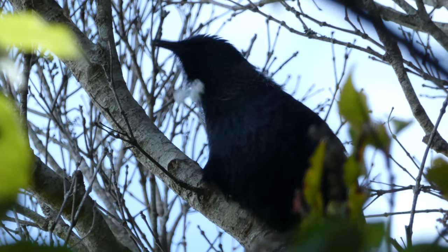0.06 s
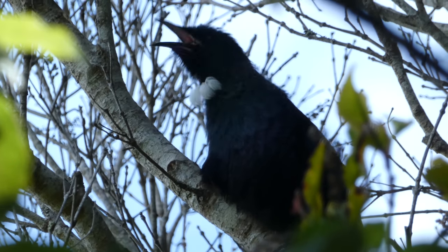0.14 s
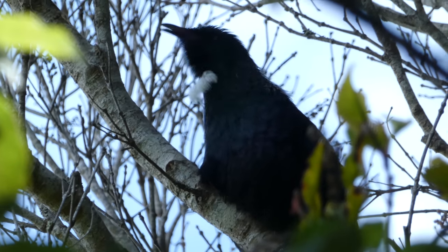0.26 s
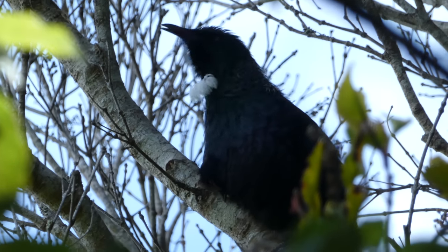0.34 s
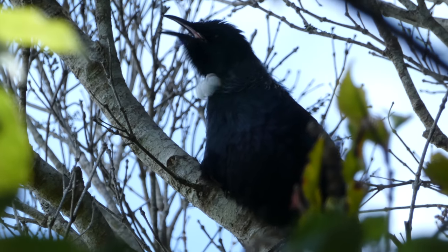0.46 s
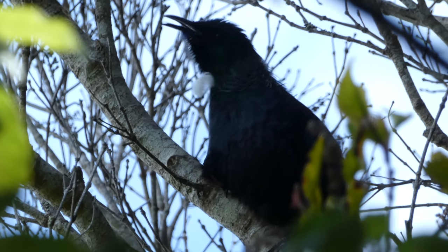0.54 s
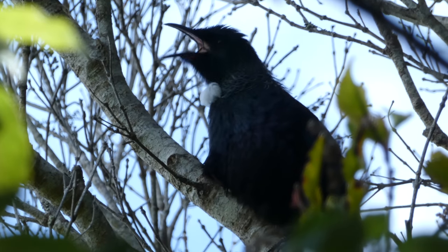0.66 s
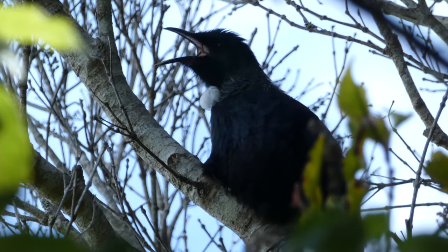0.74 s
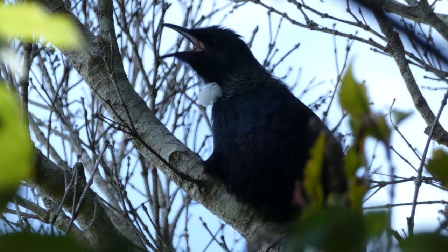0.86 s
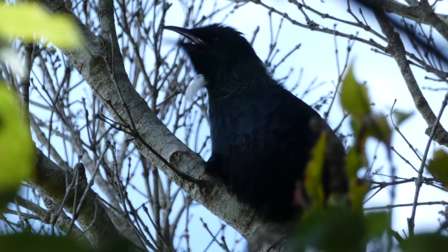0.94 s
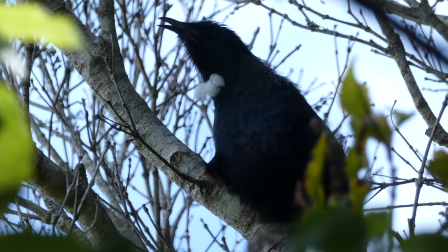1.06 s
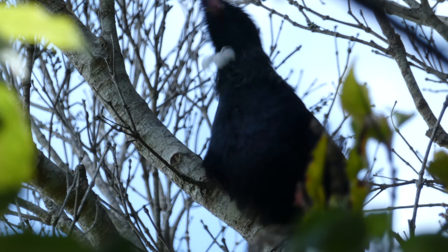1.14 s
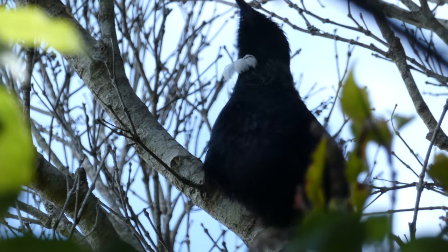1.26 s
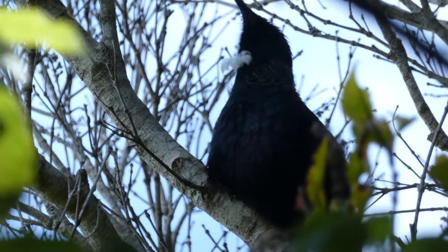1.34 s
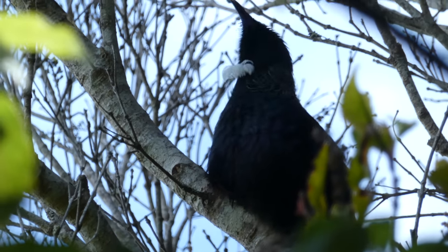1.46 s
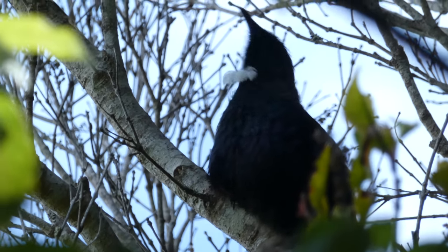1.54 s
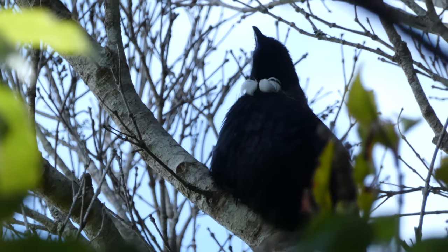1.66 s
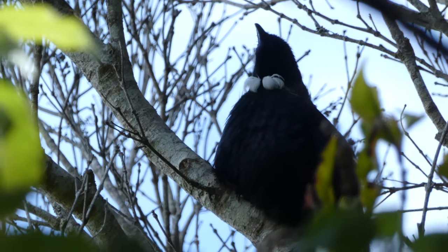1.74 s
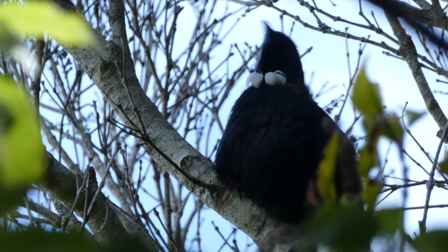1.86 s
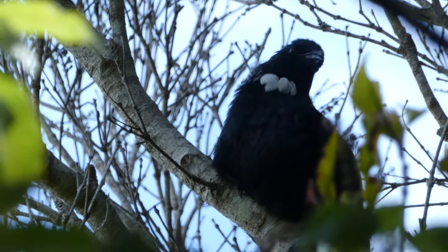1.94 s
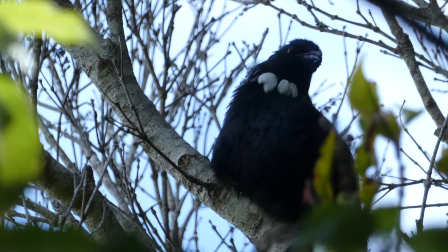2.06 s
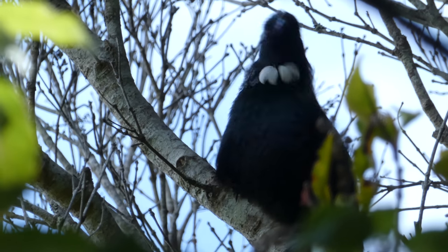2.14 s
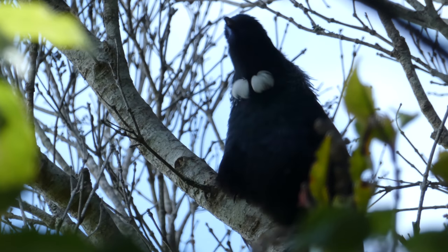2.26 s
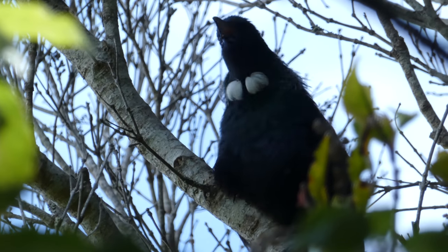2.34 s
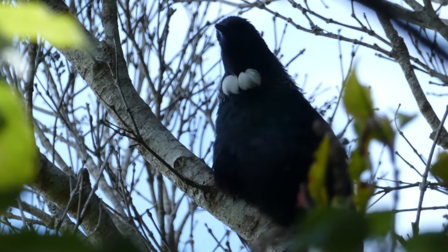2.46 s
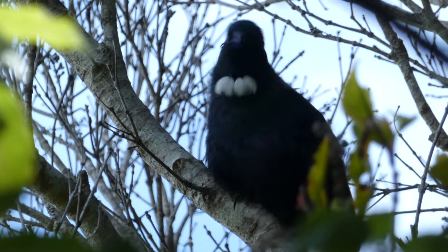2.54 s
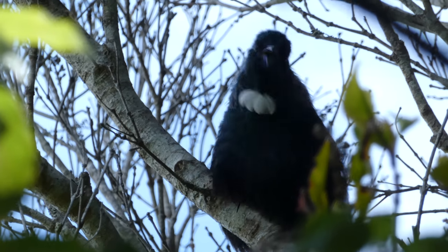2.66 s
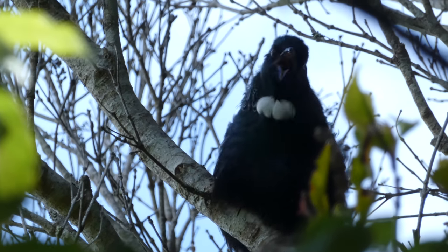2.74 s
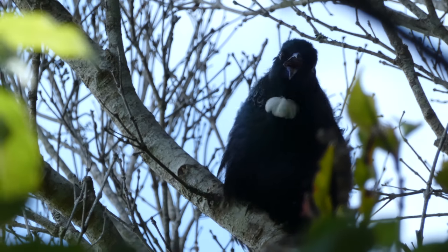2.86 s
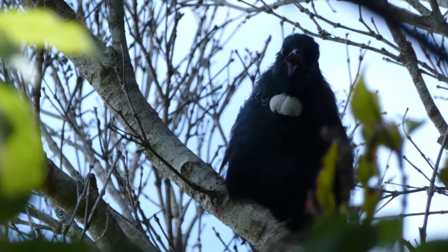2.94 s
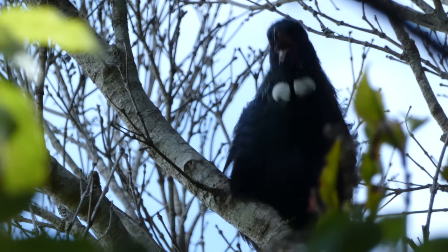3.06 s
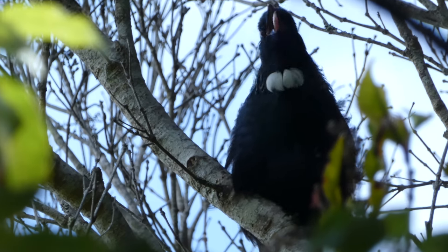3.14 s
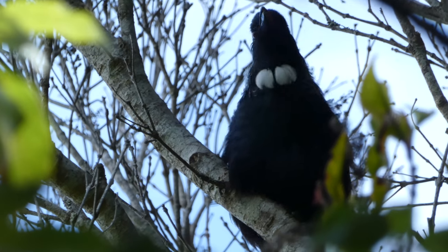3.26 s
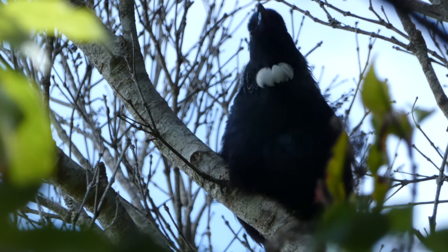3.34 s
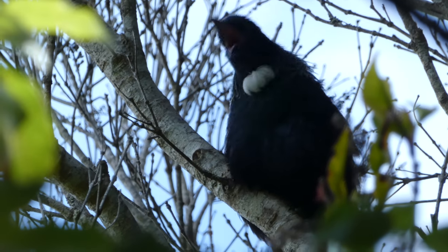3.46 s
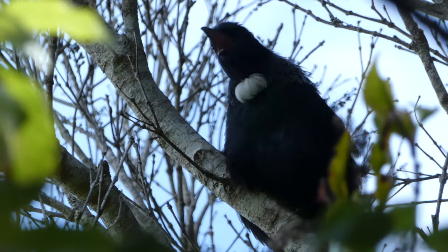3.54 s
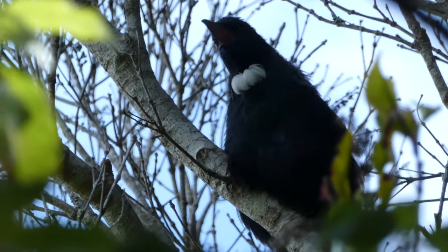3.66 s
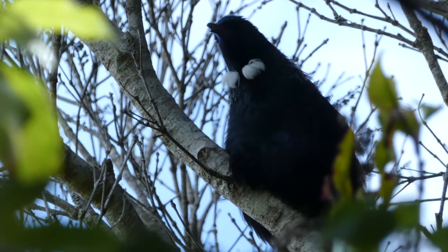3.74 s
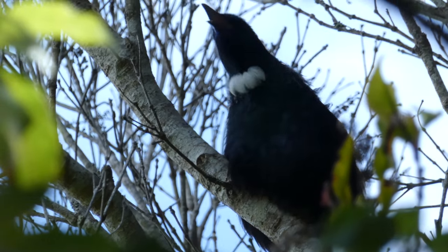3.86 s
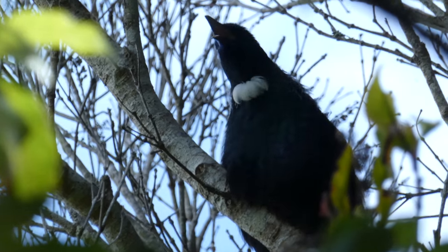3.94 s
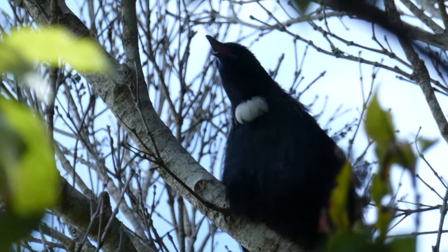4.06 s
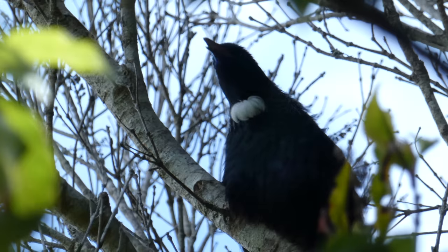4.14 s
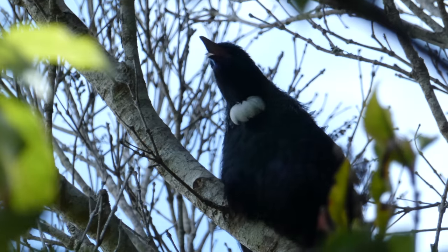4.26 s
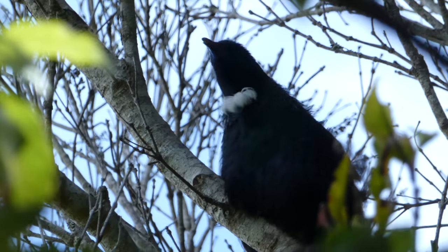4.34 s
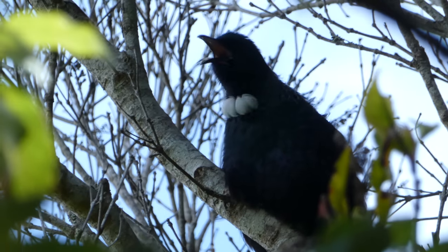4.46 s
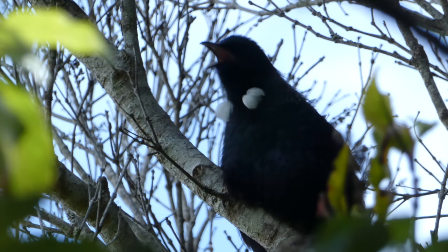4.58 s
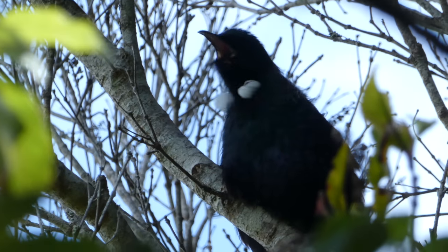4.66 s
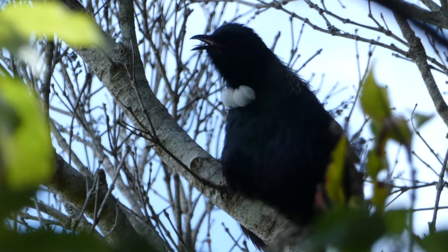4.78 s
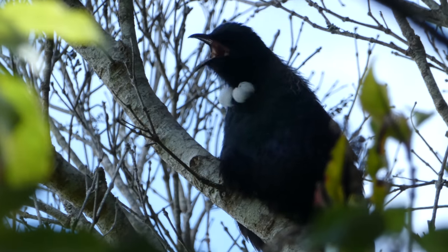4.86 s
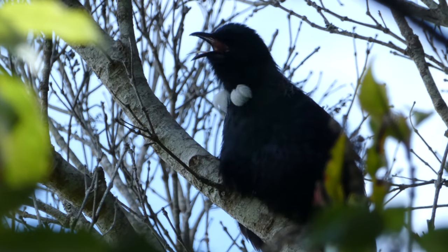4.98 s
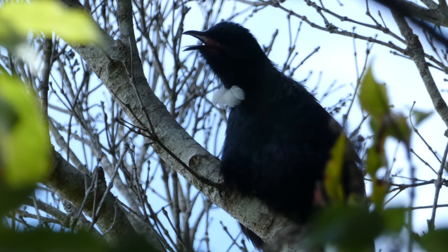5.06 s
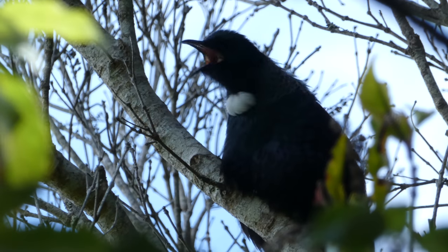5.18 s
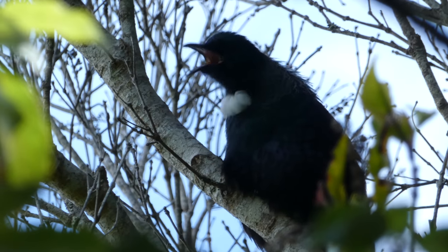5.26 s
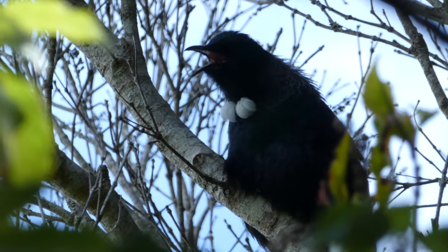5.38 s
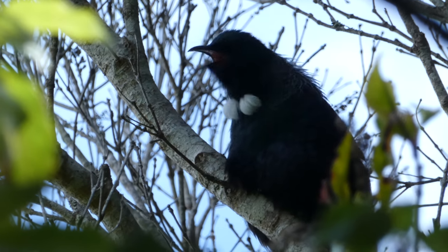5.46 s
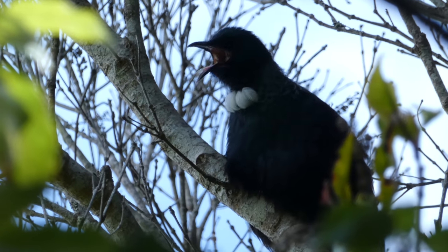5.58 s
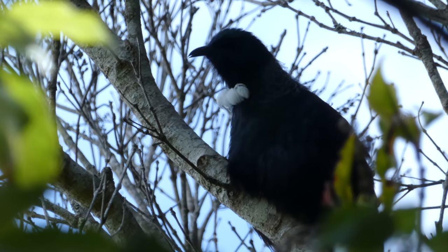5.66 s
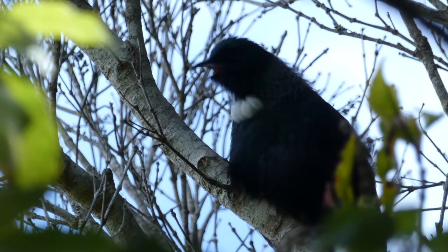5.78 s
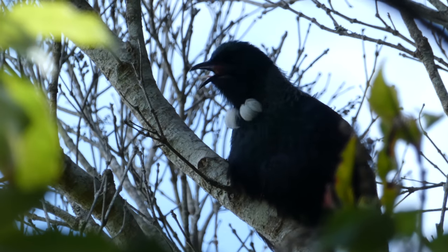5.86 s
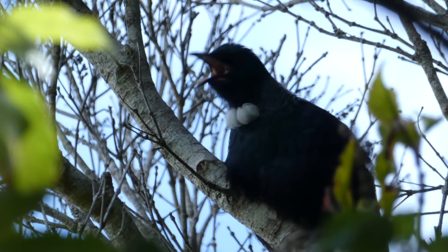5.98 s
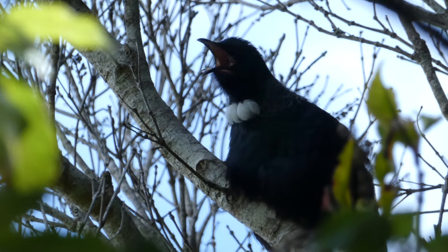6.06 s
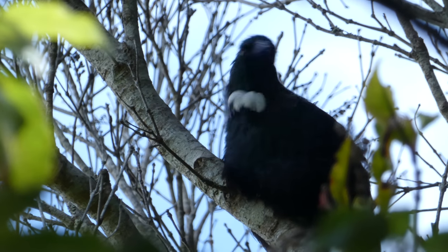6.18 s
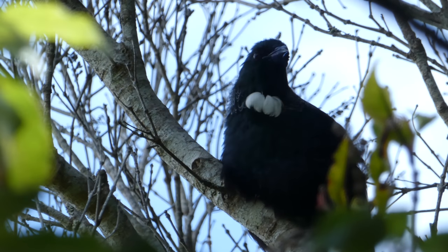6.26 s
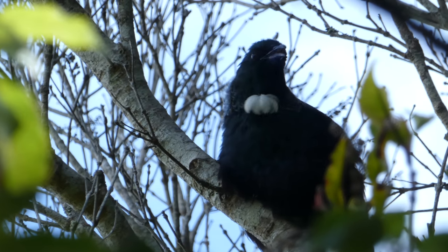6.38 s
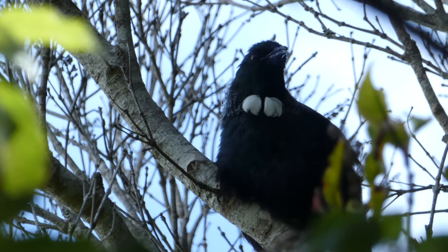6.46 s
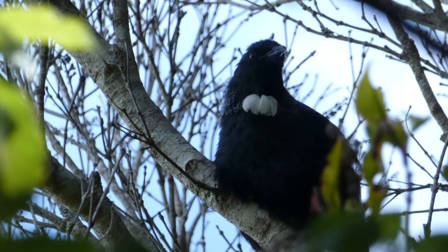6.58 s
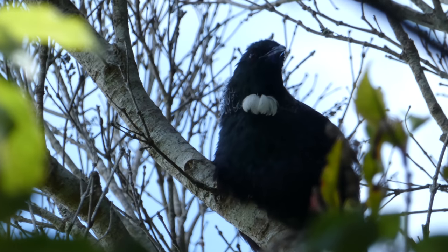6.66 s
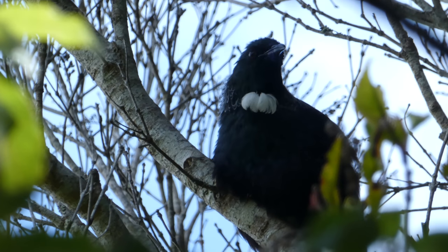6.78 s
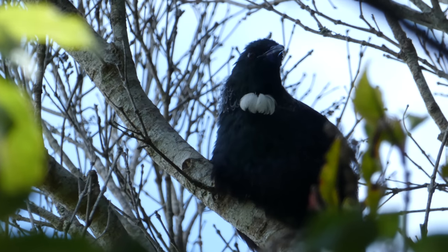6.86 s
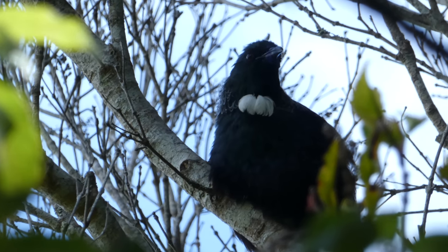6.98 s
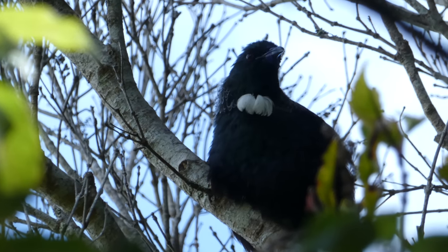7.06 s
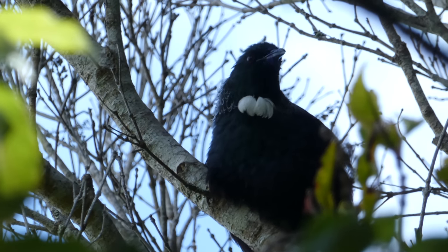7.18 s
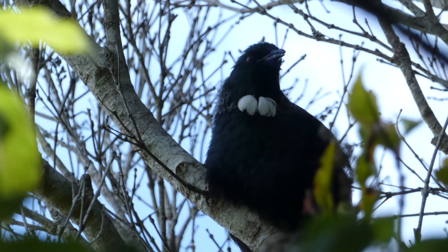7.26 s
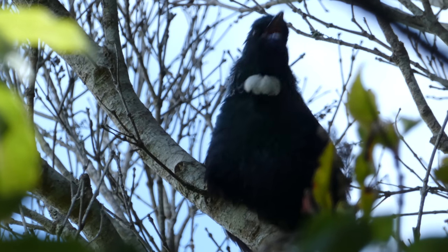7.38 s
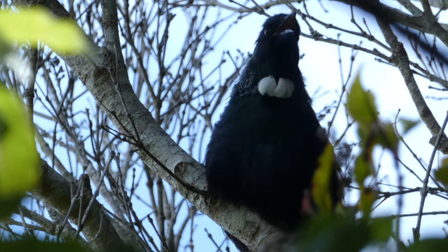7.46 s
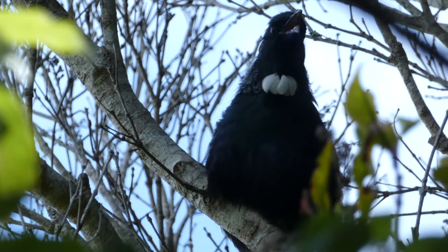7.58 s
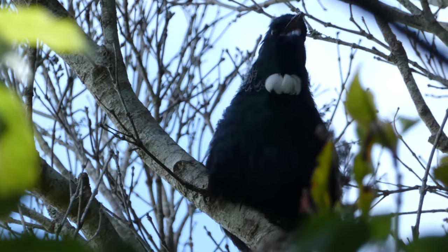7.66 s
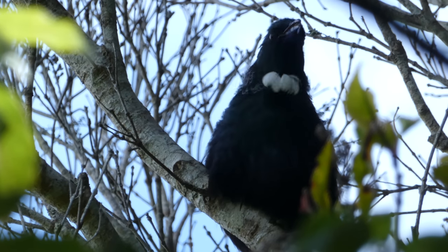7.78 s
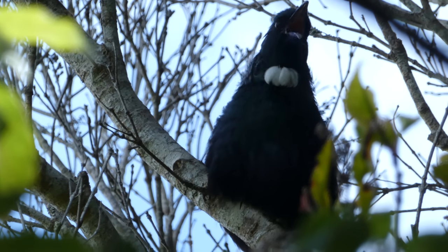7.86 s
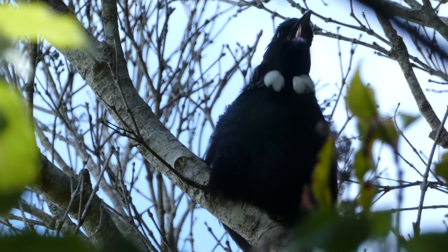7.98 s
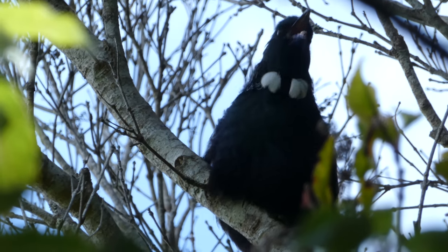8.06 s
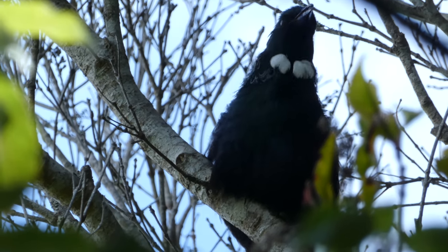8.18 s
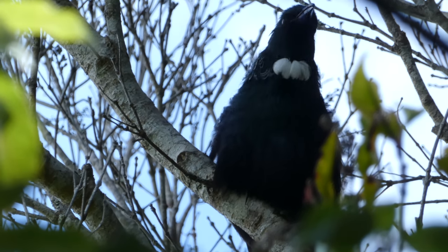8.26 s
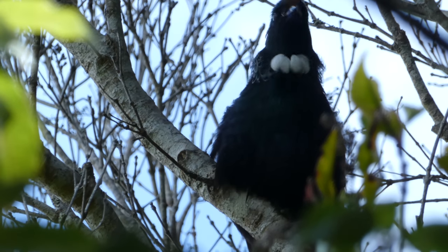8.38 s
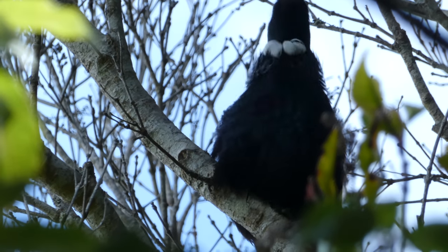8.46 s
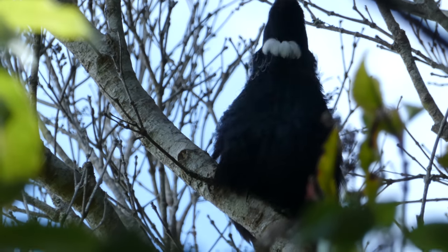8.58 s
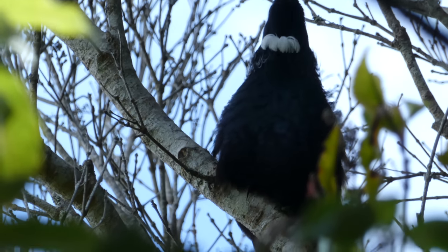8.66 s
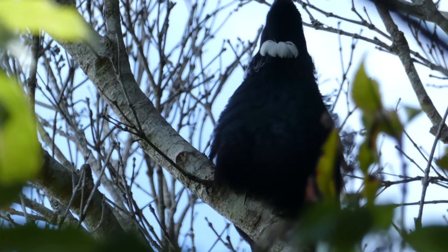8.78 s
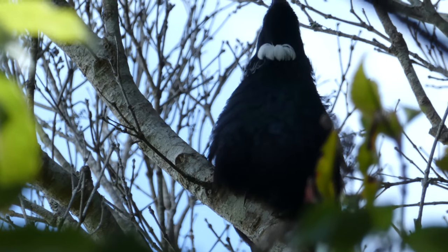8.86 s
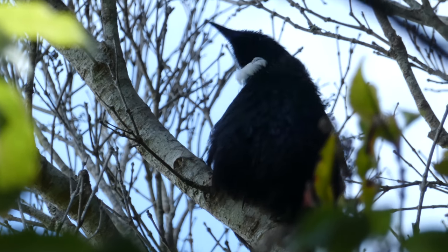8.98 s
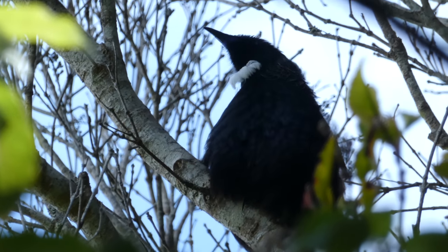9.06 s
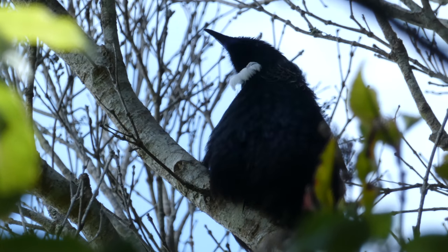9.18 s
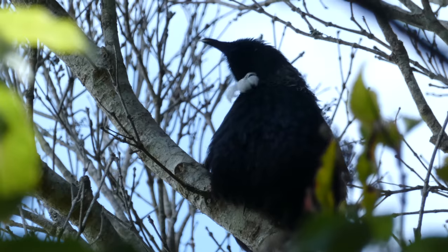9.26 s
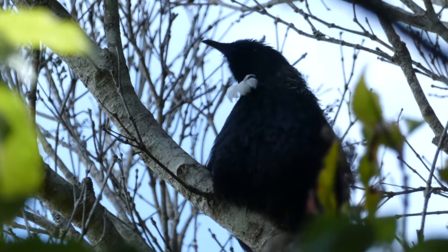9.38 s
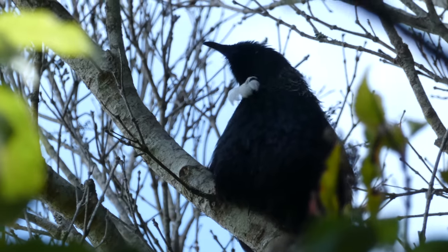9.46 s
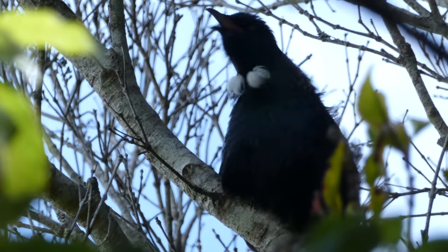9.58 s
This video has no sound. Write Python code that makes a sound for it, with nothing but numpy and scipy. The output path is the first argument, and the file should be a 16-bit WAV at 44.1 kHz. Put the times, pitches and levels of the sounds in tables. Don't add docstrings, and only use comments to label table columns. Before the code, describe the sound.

A close perched songbird delivers clicks, trills, whistles, heavy rattles and a ringing bell note, with short pauses, over faint outdoor hiss.

```python
import sys
import numpy as np
from scipy import signal
from scipy.fft import rfft, irfft, next_fast_len
from scipy.io import wavfile
from scipy.ndimage import uniform_filter1d, map_coordinates

SR = 44100
rng = np.random.default_rng(int(sys.argv[2]) if len(sys.argv) > 2 else 0)


def file_out(sig):
    cols = np.atleast_2d(sig).T
    lim = np.clip(cols, -1, 1)
    pcm = np.round(lim * 32767).astype(np.int16)
    wavfile.write(sys.argv[1], SR, pcm)


def decibels_to_gain(level_db):
    exponent = np.asarray(level_db, float) / 20
    return 10 ** exponent


N = 424683
TOP_HZ = 15750

# [pitch_hz, level_db per hz]
AIR_MID = [(20, -0.5), (59, -13.5), (310, -3), (1690, -12), (1830, -5), (2560, -17.5), (4230, -16.5),
           (15700, -28.5)]
# [pitch_hz, level_db per hz]
AIR_SIDE = [(20, -48), (59, -22), (260, -5.5), (560, -9), (1600, -17), (3000, -25.5), (6000, -34),
            (15700, -39.5)]
AIR_DB = -67
# [time_s, level_db]
TRAFFIC = [
    (0, -65.5),
    (.6, -65.5),
    (1.6, -63.5),
    (2.2, -69),
    (3.5, -72),
    (4.2, -89),
    (7.3, -88),
    (9.63, -92),
]
# [centre_hz, width_hz, level_db]
ROAD_RESONANCE = [(620, 720, 0)]

# [start_s, length_s, pitch_hz, level_db]
FAR_BIRDS = [(1.589, 0.29, 650, -70), (1.55, 0.25, 807, -66.5), (6.583, 0.14, 4070, -63),
             (6.758, 0.13, 4170, -63), (6.945, 0.077, 4360, -63), (7.0, 0.19, 3670, -64.5),
             (7.313, 0.12, 4370, -65.5), (7.67, 0.19, 4100, -60), (8.196, 0.11, 4310, -60.5),
             (9.376, 0.11, 2195, -59), (5.48, 0.19, 4310, -62)]
FAR_SAG = 0.033
FAR_BLUR_HZ = 150

# [pitch_hz, t60_s]
TREE_DECAY = [(500, 0.42), (2000, 0.39), (6000, 0.26), (12000, 0.11)]
# [delay_s, level_db]
ECHOES = [
    (.004, -26),
    (.009, -4),
    (.016, -8),
    (.04, -19),
]
ECHO_TOP_HZ = 4500
LEAF_T60_S, LEAF_DB, LEAF_HZ = 0.23, -1, 5000

# delay_s, length_s, first_hz, middle_hz, last_hz, level_db
GULP = (.003, .023, 930, 650, 630, -45)

# [time_s, level_db, pitch_hz, throat_drop (0-1)]
BARKS = [
    [(1.192, -62, 991.4, 0.1), (1.211, -35, 1004, 0.1), (1.233, -40, 990, 0.3), (1.249, -33.5, 817, 0.99),
     (1.275, -46.5, 780, 1)],
    [(8.453, -65, 999, 0.01), (8.466, -37, 985.6, 0), (8.488, -28, 968.5, 0.01), (8.502, -30.5, 950, 0),
     (8.514, -28, 935.5, 0.03), (8.523, -34, 933.5, 0.4), (8.545, -40, 880, .8), (8.565, -48, 766, 0.99),
     (8.63, -64, 400, 1)],
]
# [pitch_hz, level_db per hz]
BARK_THROATS = [
    ([(600, -40), (838, -39), (954, -6), (1480, -15), (1960, 7.5), (3500, -9), (4240, 2.5), (13000, -49)], [(800, -31), (1550, -1), (2470, -22), (3280, -13.5), (4080, -33), (4950, -15.5), (6240, -30), (13000, -67)]),
    ([(600, -35), (700, -33), (890, -7), (1200, -14), (1810, -2.5), (3030, 0), (5740, -8.5), (15500, -90)], [(200, -56), (400, -4.5), (900, -9), (1500, 6), (2300, -40), (4800, -3), (7500, -10), (15500, -33.5)]),
]
STUTTER_HZ = (235, 295)
DROPPED_STUTTER_HZ, BARK_NOISE = 155, .46

# [start_s, length_s, pitch_hz, level_db]
WHEEZES = [(2.365, .041, 9338, -68), (2.749, 0.014, 1100, -48), (2.753, 0.026, 4180, -50),
           (3.02, 0.061, 10240, -64), (4.61, 0.17, 5850, -66.5), (4.649, .02, 8000, -63),
           (4.883, 0.089, 4480, -55.5), (4.884, 0.072, 3276, -57), (5.45, 0.045, 8900, -60),
           (7.402, 0.07, 9100, -59.5), (7.733, .03, 9900, -67), (7.95, 0.23, 3500, -58),
           (8.3, 0.033, 2000, -58), (5.6, 0.074, 3130, -65), (5.92, .06, 7400, -64), (7.95, .1, 12000, -66),
           (2.25, .03, 12000, -62), (3.085, .01, 1030, -60), (1, .015, 1400, -53)]
WHEEZE_WIDTH_HZ, WHEEZE_WIDENS = 180, 0.13

# [time_s, peak_db]
TICKS = [
    (.2019, -43),
    (.2177, -32),
    (.2315, -32),
    (.2458, -39),
    (.2580, -30),
    (.2712, -33),
    (.2822, -32),
]
# [centre_hz, width_hz, level_db]
TICK_THROAT = [(4290, 530, 4.5), (6980, 740, -5), (9450, 3600, -20.5)]
# [time_s, peak_db, low_hz, high_hz]
KNOCKS = [
    (3.4658, -32, 2490, 5150),
    (3.4904, -33, 2280, 4604),
    (3.5173, -29, 2640, 5520),
    (3.5464, -25.5, 2460, 5260),
    (3.574, -25, 2380, 4950),
    (3.6015, -26, 2580, 5400),
    (3.6325, -23, 2360, 5000),
    (3.6633, -26.5, 2620, 5340),
    (3.6926, -25, 2530, 5000),
    (3.7176, -38.5, 2600, 4500),
]
# [centre_hz, width_hz, level_db]
KNOCK_THROAT = [(2496, 470, -2.5), (5180, 740, 0.5), (4000, 300, -10.5), (7650, 410, -10),
                (9800, 2600, -20.5)]
KNOCK_FLOOR_HZ = 1900
# [time_s, peak_db]
SCRAPES = [
    (7.4104, -47.5),
    (7.4261, -37.5),
    (7.439, -39),
    (7.4505, -42.5),
    (7.4718, -33),
    (7.4834, -42),
]
# [centre_hz, width_hz, level_db]
SCRAPE_THROAT = [(1200, 2600, -3.5), (2280, 540, 1.5), (3730, 630, 4.5), (5530, 980, 0.5),
                 (9200, 2100, -10.5), (13010, 3700, -36)]
# [centre_hz, width_hz, level_db]
STROKE_THROAT = [(2000, 1600, -8.5), (3510, 500, 12.5), (4100, 601, -29)]
SNAP_SWEEP = 1.8
SNAP_TOP_HZ = 7500
# [time_s, peak_db, pitch_hz]
POPS = [
    (.1478, -37, 1050),
    (.1478, -42, 1600),
    (.1692, -38, 1200),
    (.1692, -43, 800),
    (5.285, -54, 9200),
    (7.627, -43, 2300),
    (7.629, -44, 4200),
]
POP_T60_S = .008

# [start_s, level_db]
TRILL = [(0.724, -42.5), (.749, -37), (.775, -36), (.799, -35), (.823, -33.5), (.849, -34.5), (.874, -36),
         (6.006, -38), (6.031, -34.5), (6.056, -35), (6.08, -35.5), (6.106, -34), (6.132, -35), (6.16, -35)]
# length_s, first_hz, middle_hz, last_hz
CHIRP = (.019, 1050, 1240, 1340)
CHIRP_PARTIALS = [-11, -0.5, 1.5, -17.5, -32.5, -50, -48, -36, -44, -44, -46]
# [centre_hz, width_hz, level_db]
TRILL_THROAT = [(1250, 700, 0), (2350, 900, 1), (3720, 520, 3), (5000, 1400, 2), (10000, 9000, 8)]
TRILL_OPENS, TRILL_SCATTER = 1.05, .008

# [start_s, length_s, pitch_hz, level_db]
HELD = [(0.125, 0.029, 6000, -57), (0.152, 0.019, 5750, -47), (0.475, 0.052, 1782, -53),
        (0.989, 0.028, 1964, -50), (2.247, 0.0062, 5800, -36), (2.264, 0.013, 5780, -33),
        (2.354, 0.021, 6170, -34.5), (2.769, 0.044, 6050, -44), (3.88, 0.04, 3970, -48.5),
        (3.89, 0.031, 4860, -60), (4.204, 0.025, 2720, -55), (4.205, .0226, 5420, -64),
        (4.228, 0.037, 2170, -58), (4.601, 0.037, 2120, -43.5), (4.724, 0.0038, 4650, -31),
        (4.744, 0.0046, 4670, -39), (4.752, 0.03, 10180, -51.5), (4.972, 0.061, 2217, -45.5),
        (5.477, 0.038, 10830, -64), (7.917, 0.0045, 4050, -35), (7.608, .016, 3890, -55),
        (7.627, 0.021, 3760, -42.5), (7.628, 0.011, 2280, -47.5), (7.628, 0.026, 7380, -63),
        (7.818, 0.015, 2514, -45.5)]
# [start_s, length_s, first_hz, last_hz, level_db]
RISES = [(2.219, 0.017, 5570, 6530, -48), (2.69, 0.024, 3340, 5660, -57), (2.704, 0.032, 5420, 6020, -42),
         (2.767, 0.013, 2700, 5900, -44), (2.928, 0.058, 5850, 7900, -44.5),
         (3.001, 0.055, 5400, 8000, -44), (3.05, 0.028, 7950, 8100, -49.5), (3.018, 0.033, 3050, 4050, -52),
         (3.045, 0.024, 3950, 3900, -49), (5.838, 0.0215, 2000, 2200, -57),
         (3.855, 0.033, 1384, 1950, -51.5), (3.882, 0.037, 1900, 2000, -53), (3.872, 0.02, 3200, 3950, -57),
         (4.261, .014, 3450, 4000, -60), (4.463, 0.035, 3050, 3600, -62), (4.465, 0.029, 1560, 1760, -62),
         (4.446, 0.046, 4080, 4250, -70), (4.545, .014, 3400, 4500, -62), (2.92, 0.042, 3000, 3510, -62),
         (4.284, 0.019, 3500, 4030, -51), (4.282, 0.029, 1840, 2100, -56), (4.676, 0.041, 1683, 1820, -48),
         (4.745, 0.0085, 7900, 10200, -48), (5.283, 0.004, 4250, 5000, -32.5),
         (5.813, .0485, 4012, 6000, -64)]
# [start_s, length_s, first_hz, last_hz, level_db]
FALLS = [(0.453, 0.029, 5000, 4600, -50.5), (2.971, 0.009, 6600, 4100, -45.5),
         (3.871, 0.031, 3600, 2870, -46.5), (3.891, 0.029, 2880, 2746, -45.5),
         (4.183, 0.068, 2000, 1710, -55.5), (4.223, 0.029, 4520, 4030, -52.5),
         (4.224, 0.035, 3800, 3600, -62), (4.266, 0.035, 4180, 3710, -55), (4.302, 0.034, 2020, 1777, -53),
         (4.299, 0.0344, 4080, 3590, -48.5), (4.57, 0.0055, 4900, 3800, -37.5),
         (4.58, 0.067, 2040, 1708, -42.5), (4.644, 0.0074, 5830, 5300, -52),
         (4.66, 0.0048, 5100, 4350, -33), (4.663, 0.053, 2516, 2013, -44.5),
         (4.726, 0.022, 9800, 8300, -57), (5.048, 0.032, 4950, 4450, -39.5), (5.072, 0.1, 4550, 2510, -51),
         (5.397, 0.09, 8820, 8050, -57), (7.916, 0.026, 8550, 7900, -50.5)]
# [start_s, length_s, first_hz, last_hz, level_db]
FLICKS = [(.228, 0.018, 1493, 1750, -50.5), (.647, 0.08, 2577, 2380, -51.5),
          (4.087, 0.019, 2820, 2500, -51.5), (4.471, 0.055, 2134, 2860, -50),
          (4.488, 0.029, 4050, 5000, -62), (5.31, 0.077, 9640, 8200, -55),
          (5.381, 0.068, 10800, 9550, -60.5), (5.436, 0.059, 9150, 8400, -54),
          (7.73, 0.01, 7500, 6861, -56.5)]
SWOOP_HALFWAY, FLICK_HALFWAY = .67, 0.071
OVERTONE_DB = -30

# [start_s, length_s, first_hz, middle_hz, last_hz]
CHIMES = [(1.08, 0.053, 1130, 1074, 1036), (5.593, 0.076, 1240, 1270, 1260), (5.799, 0.041, 670, 830, 1188),
          (5.847, 0.13, 1200, 1244, 1217), (6.436, 0.0323, 1084, 937, 920),
          (7.626, 0.053, 1230, 1320, 1323), (7.74, 0.056, 1350, 1250, 1250), (8.15, 0.052, 533, 567, 603),
          (8.307, 0.076, 1220, 1230, 1250), (8.392, 0.061, 1602, 1735, 1390), (8.57, 0.036, 502, 499, 620),
          (5.192, 0.098, 4000, 3773, 3900)]
CHIME_PARTIALS = [(-35, -69, -74, -56, -62), (-53, -41.5, -37.5, -57, -65.5), (-54.5,),
                  (-47, -47.5, -51, -60.5, -58.5), (-48.5, -50, -50, -50.5, -54, -59.5),
                  (-47.5, -61.5, -66.5), (-43, -55, -64), (-55,), (-61.5,), (-40.5, -58.5), (-50.5,),
                  (-46.5,)]
EARLY_CREST, LATE_CREST = 0.75, 0.48
# [start_s, length_s, level_db]
HOLLOW = [
    (3.959, 0.05, -47.5),
    (4.098, 0.021, -55),
]
HOLLOW_HZ = 627.3
HOLLOW_PARTIALS = [-4.5, 1.5, -28, -2.5, -2.5]
# [start_s, level_db, first_hz, held_hz]
PEAL = [
    (3.121, -35.5, 936, 1038),
    (3.162, -30, 954, 1040),
    (3.204, -30, 941, 1037),
    (3.25, -31, 1028, 1023),
]
STROKE_S, STROKE_HALFWAY = .019, .8
STROKE_PARTIALS = [-15, -3, -1, -8.5, -30, -36, -57, -45, -33.5, -35.5]

# [time_s, pitch_hz, level_db, throat_focus_hz]
BELL = [
    (7.935, 1288, -63, 2400),
    (7.95, 1225, -33, 2420),
    (7.958, 1197, -24, 2395),
    (7.963, 1182, -30, 2365),
    (7.97, 1168, -21.5, 2340),
    (7.987, 1168, -22, 2340),
    (8.006, 1170, -29, 2340),
    (8.021, 1172, -22, 2345),
    (8.037, 1178, -22.5, 2356),
]
# [time_s, pitch_hz, level_db, throat_focus_hz]
SLIDE = [
    (8.045, 1164, -41, 3000),
    (8.063, 1127, -47, 3330),
    (8.08, 1087, -43, 3230),
    (8.095, 972, -40.5, 2900),
    (8.112, 812, -38, 2420),
    (8.128, 676, -46, 2050),
    (8.139, 563, -43.5, 1700),
    (8.155, 546, -50.5, 1640),
    (8.195, 580, -66, 1720),
    (8.211, 570, -74, 1750),
]
BELL_FOCUS_HZ = 240
BELL_LEAK = [-43, -64, -62, -68, -82, -84, -84, -80]
UPPER_FOCUS, UPPER_DB = 5 / 3, -17
SLIDE_ROUGH = .3
BELL_ECHO_DB, SLIDE_ECHO_DB = -11, -1
BELL_PAN_DB = -.8
# [start_s, length_s, pitch_hz, level_db]
PIPS = [
    (1.036, 0.0194, 2016, -29.5),
    (1.054, 0.015, 2053, -30),
    (7.757, 0.021, 2520, -36.5),
    (7.766, 0.018, 2520, -27),
    (7.791, 0.024, 2520, -38.5),
    (8.042, .01, 2374, -26),
    (8.053, .012, 2368, -32),
    (8.065, 0.014, 2368, -32),
    (7.944, .035, 1860, -48),
    (7.76, 0.037, 2200, -54.5),
]
PIP_ECHO_DB = -6


def unit(x):
    return x / np.sqrt(np.mean(x ** 2) + 1e-20)


def along(points, hz):
    f, v = np.transpose(points)
    return np.interp(np.log(hz + 1), np.log(f + 1), v)


def wobble(count, rate):
    knots = rng.standard_normal(int(count / SR * 1000) + 8)
    return map_coordinates(knots, [np.arange(count) * min(rate, 1000) / SR])


def filtered(x, response):
    m = next_fast_len(x.shape[-1] + SR // 4)
    return irfft(rfft(x, m) * response(np.fft.rfftfreq(m, 1 / SR)), m)[..., :x.shape[-1]]


def resonances(modes):
    return lambda f: sum(decibels_to_gain(db) * (1j * f * w / (c * c - f * f + 1j * f * w)) ** 2 for c, w, db in modes)


def add(track, s, sound):
    track[round(s * SR):][:len(sound)] += sound


def note(length, first_hz, mid_hz, last_hz, partials_db, crest, flutter_db, rough, edge, order=1):
    u = np.arange(round(length * SR)) / round(length * SR)
    pitch = np.polyval(np.polyfit([0, .5, 1], [first_hz, mid_hz, last_hz], 2), u)
    phase = 2 * np.pi * np.cumsum(pitch * (1 + 0.011 * wobble(len(u), 160.7))) / SR

    def breath():
        flutter = decibels_to_gain(flutter_db * wobble(len(u), 86.7))
        return unit(flutter * (1 + rough * wobble(len(u), 505.0)))

    tone = sum(decibels_to_gain(db) * breath() * np.sin((order + k) * phase) for k, db in enumerate(partials_db))
    bend = np.log(.5) / np.log(np.clip(crest, .1, .9))
    return tone * np.sin(np.pi * u ** bend) ** abs(edge)


def air():
    z = signal.stft(rng.standard_normal((2, N)), nperseg=512)[2]
    patches = uniform_filter1d(uniform_filter1d(rng.standard_normal(z.shape[1:]), 6, 0), 14, 1)
    pair = signal.istft(z * decibels_to_gain(1.86 * unit(patches)), nperseg=512)[1][:, :N]
    mid, side = filtered(pair, lambda hz: decibels_to_gain([along(AIR_MID, hz), along(AIR_SIDE, hz)]))
    mid, side = unit(mid) * decibels_to_gain(4.5), unit(side) * decibels_to_gain(5.5)
    return decibels_to_gain(AIR_DB) * np.array([mid + side, mid - side])


def road():
    s, db = np.transpose(TRAFFIC)
    drone = unit(filtered(rng.standard_normal((2, N)), resonances(ROAD_RESONANCE)))
    return decibels_to_gain(np.interp(np.arange(N) / SR, s, db)) * drone


def far_birds():
    out = np.zeros(N + SR)
    for s, length, hz, db in FAR_BIRDS:
        blurred = s > 5
        first, last = hz * (1 + FAR_SAG * blurred), hz * (1 - FAR_SAG * blurred)
        call = note(length, first, hz, last, [db - 5.5 * blurred], .4, flutter_db=3.5, rough=.15, edge=.6)
        if blurred:
            call = call * unit(wobble(len(call), 2 * FAR_BLUR_HZ))
        add(out, s, call)
    return out


def trees(x, alike, piece=SR // 4):
    out, x = np.zeros((2, N + 3 * SR)), np.pad(x, (piece, 2 * piece))
    fade = np.sin(np.pi * np.arange(2 * piece) / (2 * piece))
    for a in range(0, N + piece, piece):
        hz, t, z = signal.stft(rng.standard_normal((2, SR // 2)), SR, nperseg=256)
        tail = signal.istft(z * decibels_to_gain(-60 * t / along(TREE_DECAY, hz)[:, None]), SR, nperseg=256)[1]
        mid, side = tail / np.linalg.norm(tail[0])
        side = (1 - alike) * side
        wet = signal.fftconvolve(x[None, a:a + 2 * piece] * fade, [mid + side, mid - side], axes=1)
        out[:, a + 130:a + 130 + wet.shape[1]] += wet
    return out[:, piece:piece + N]


def leaves(x):
    t = np.arange(SR // 5) / SR
    tail = rng.standard_normal((3, len(t))) * decibels_to_gain(-60 * t / LEAF_T60_S) * (t > .002)
    tail = (tail[0] + 0.54 * tail[1:]) / np.linalg.norm(tail[0])
    high = filtered(x, lambda f: (1j * f / LEAF_HZ / (1 + 1j * f / LEAF_HZ)) ** 2)
    return decibels_to_gain(LEAF_DB) * signal.fftconvolve(high[None], tail, axes=1)[:, :N]


def trunks(x):
    out = np.zeros((2, N))
    dull = filtered(x, lambda f: 1 / (1 + 1j * f / ECHO_TOP_HZ) ** 2)
    for k, (delay, db) in enumerate(ECHOES):
        lean = np.array([[1.5], [-1.5]]) * (-1) ** k
        out += decibels_to_gain(db + lean) * np.pad(dull, (round(delay * SR), 0))[:N]
    return out


def gulps():
    out = np.zeros(N + SR)
    delay, *shape, hum_db = GULP
    for s, db, *_ in KNOCKS:
        level = hum_db + 0.5 * (db + 14) + rng.normal(0, 1.5)
        hum = note(*shape, [level], .5, flutter_db=1.5, rough=.15, edge=.5)
        add(out, s + delay + rng.normal(0, .0015), hum)
    return out


def wheezes():
    out = np.zeros(N + SR)
    for s, length, hz, db in WHEEZES:
        breath = rng.standard_normal(round(length * SR))
        throat = resonances([(hz, WHEEZE_WIDTH_HZ + WHEEZE_WIDENS * hz, 0)])
        add(out, s, decibels_to_gain(db) * np.hanning(len(breath)) ** 0.3 * unit(filtered(breath, throat)))
    return out


def barks():
    out = np.zeros(N + SR)
    for rows, (early, late), rate in zip(BARKS, BARK_THROATS, STUTTER_HZ):
        s, *cols = np.transpose(rows)
        t = np.arange(s[0], s[-1], 1 / SR)
        db, pitch, drop = [np.interp(t, s, c) for c in cols]
        drop = np.clip(drop, 0, 1)
        cycles = np.cumsum(pitch * (1 + .028 * wobble(len(t), 400))) / SR
        pulses = unit(sum(np.cos(2 * np.pi * k * cycles + .16 * k * k) for k in range(1, 15)))
        noise = np.tanh(rng.standard_normal(len(t)))
        source = np.sqrt(1 - BARK_NOISE) * pulses + np.sqrt(BARK_NOISE) * noise
        stutter = rate + drop * (DROPPED_STUTTER_HZ - rate)
        beat = np.cumsum(stutter * (1 + 0.23 * wobble(len(t), 200))) / SR % 1
        source *= .22 + np.exp(-3.6 * beat)
        a, b = [unit(filtered(source, lambda f: decibels_to_gain(along(c, f)))) for c in (early, late)]
        add(out, s[0], decibels_to_gain(db) * (np.sqrt(1 - drop) * a + np.sqrt(drop) * b))
    return out


def snap(throat, puff_db, floor_hz):
    t = np.arange(SR // 10) / SR
    spike = filtered(1. * (t == 0), lambda f: 1 / (1 + 1j * f / SNAP_TOP_HZ) ** 2)
    puff = decibels_to_gain(puff_db - 60 * t / .04) * rng.standard_normal(len(t))
    modes = [(c * decibels_to_gain(rng.normal(0, .12)), w, db + rng.normal(0, 1.5)) for c, w, db in throat]
    ring = filtered(spike + puff, resonances(modes))

    def slide(f):
        late = np.exp(-2j * np.pi * SNAP_SWEEP * (np.log1p(f) - f / TOP_HZ))
        return late / (1 + (floor_hz / (f + 1)) ** 6)

    ring = filtered(ring, slide)
    return ring / abs(ring).max()


def rattles():
    out = np.zeros(N + SR)
    strikes = [(s, db - 2) for s, db, *_ in PEAL]
    for rattle, throat, puff_db in ((TICKS, TICK_THROAT, -25), (KNOCKS, KNOCK_THROAT, -28),
                                    (SCRAPES, SCRAPE_THROAT, -12), (strikes, STROKE_THROAT, -5)):
        for s, db, *moved in rattle:
            tuned = [(hz, *mode[1:]) for hz, mode in zip(moved, throat)] + list(throat[len(moved):])
            ring = snap(tuned, puff_db, KNOCK_FLOOR_HZ if moved else 0)
            add(out, s - SNAP_SWEEP / 6000, decibels_to_gain(db) * ring)
    return out


def pops():
    out, t = np.zeros(N + SR), np.arange(SR // 10) / SR
    for s, db, hz in POPS:
        envelope = decibels_to_gain(db - 60 * t / POP_T60_S) * (1 - np.exp(-t / .0004))
        add(out, s, envelope * np.sin(2 * np.pi * hz * t))
    return out


def trill():
    out = np.zeros(N + SR)
    for k, (s, db) in enumerate(TRILL):
        factor = (TRILL_OPENS if k % 7 == 0 else 1) + rng.normal(0, TRILL_SCATTER)
        pitches = np.multiply(CHIRP[1:], factor)
        chirp = note(CHIRP[0], *pitches, CHIRP_PARTIALS, .55, flutter_db=1.5, rough=.22, edge=1.3)
        add(out, s, decibels_to_gain(db + 4.5) * chirp)
    return filtered(out, resonances(TRILL_THROAT))


def whistles():
    out = np.zeros(N + SR)
    held = [(s, length, hz, hz, db) for s, length, hz, db in HELD]
    swoops = held + list(RISES) + list(FALLS)
    for rows, halfway in ((swoops, SWOOP_HALFWAY), (FLICKS, FLICK_HALFWAY)):
        for s, length, first, last, db in rows:
            crest = 0.43 * (last / first) ** 0.39
            rough = 0.34 + 0.18 * (4.5 < s < 4.8 or first > 8000) - 0.07 * (3.8 < s < 4.5)
            middle = first + halfway * (last - first)
            add(out, s, note(length, first, middle, last, [db, db + OVERTONE_DB], crest,
                             flutter_db=2, rough=rough, edge=.8))
    return out


def chimes():
    out = np.zeros(N + SR)
    for (s, *shape), partials in zip(CHIMES, CHIME_PARTIALS):
        crest = EARLY_CREST if s < 6 else LATE_CREST
        add(out, s, note(*shape, partials, crest, flutter_db=2.5, rough=0.12, edge=0.32))
    for s, length, db in HOLLOW:
        tone = note(length, *[HOLLOW_HZ] * 3, HOLLOW_PARTIALS, 0.71,
                    flutter_db=3.5, rough=0.16, edge=0.84, order=3)
        add(out, s, decibels_to_gain(db) * tone)
    return out


def peal():
    out = np.zeros(N + SR)
    for s, db, first, last in PEAL:
        middle = first + STROKE_HALFWAY * (last - first)
        stroke = note(STROKE_S, first, middle, last, STROKE_PARTIALS, .6, flutter_db=1.2, rough=.14, edge=.4)
        add(out, s, decibels_to_gain(db) * stroke)
    return out


def pips():
    out = np.zeros(N + SR)
    for s, length, hz, db in PIPS:
        add(out, s, note(length, hz, hz, hz, [db, db - 40], .55, flutter_db=1, rough=.05, edge=1.2))
    return out


def bell():
    out = np.zeros(N + SR)
    s, *cols = np.transpose(list(BELL) + list(SLIDE))
    t = np.arange(s[0], s[-1], 1 / SR)
    pitch, db, focus = [np.interp(t, s, c) for c in cols]
    phase = 2 * np.pi * np.cumsum(pitch) / SR
    fade = np.sin(np.pi * ((t - s[0]) / (s[-1] - s[0])) ** .5) ** .8 * (pitch / pitch[0]) ** 2
    sliding = np.clip((t - SLIDE[0][0]) / .03, 0, 1)

    def near(hz):
        return 1 / (1 + (hz / BELL_FOCUS_HZ) ** 2) ** 2

    tone = 0
    for k in range(1, 9):
        upper = decibels_to_gain(UPPER_DB) * fade * near(k * pitch - UPPER_FOCUS * focus)
        leak = fade * decibels_to_gain(BELL_LEAK[k - 1] + 4 * wobble(len(t), 60))
        size = decibels_to_gain(db) * (near(k * pitch - focus) + upper) + leak
        husk = 1 + SLIDE_ROUGH * sliding * wobble(len(t), 300)
        tone = tone + size * husk * np.sin(k * phase)
    add(out, s[0], tone)
    turn_s = [SLIDE[1][0], SLIDE[2][0]]
    share_db = np.interp(np.arange(len(out)) / SR, turn_s, [BELL_ECHO_DB, SLIDE_ECHO_DB])
    return out[:N], (out * decibels_to_gain(share_db))[:N]


def scene():
    far, hum, pip = far_birds()[:N], gulps()[:N], pips()[:N]
    song = (whistles() + chimes() + peal() + trill() + rattles() + pops() + barks() + wheezes())[:N]
    ring, ring_sent = bell()
    turned = decibels_to_gain([[BELL_PAN_DB], [-BELL_PAN_DB]])
    direct = song + hum + (pip + ring) * turned
    sent = song + ring_sent + decibels_to_gain(BELL_ECHO_DB) * hum + decibels_to_gain(PIP_ECHO_DB) * pip
    out = air() + road()
    out += decibels_to_gain(1.5) * trees(far, alike=0.725) + decibels_to_gain(-7) * far
    out += decibels_to_gain(-10.5) * trees(sent, alike=.6) + leaves(sent) + trunks(sent)
    return out + direct


def top_cut(x):
    return signal.sosfilt(signal.butter(12, 16240, fs=SR, output="sos"), x)


def record(dry):
    mix = filtered(dry, lambda hz: hz < TOP_HZ)
    return top_cut(mix)


dry = scene()
out = record(dry)
file_out(out)
```